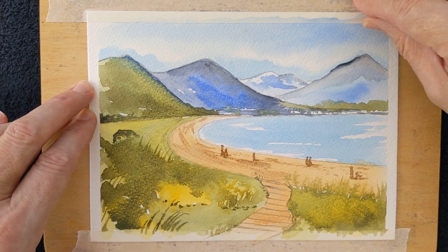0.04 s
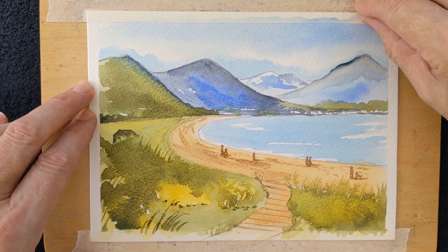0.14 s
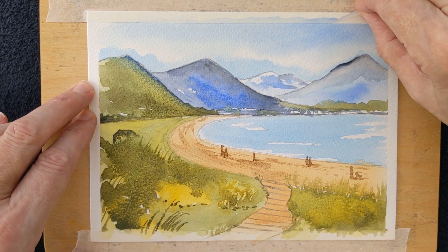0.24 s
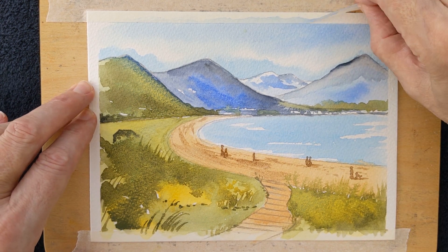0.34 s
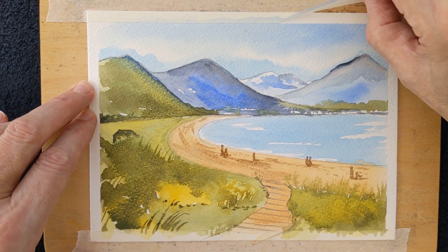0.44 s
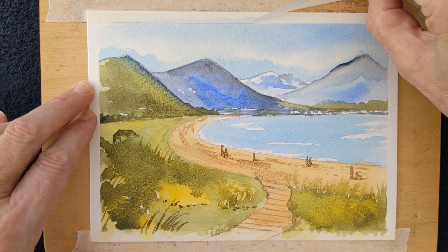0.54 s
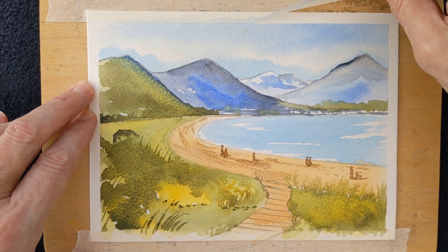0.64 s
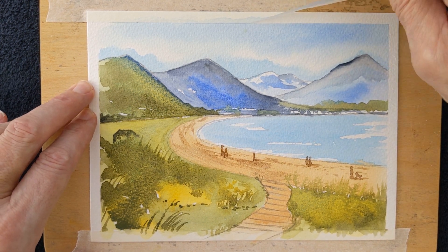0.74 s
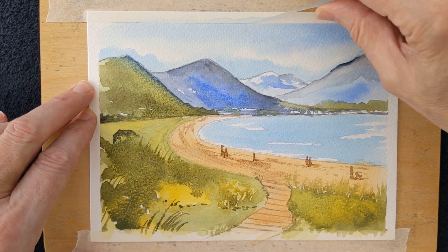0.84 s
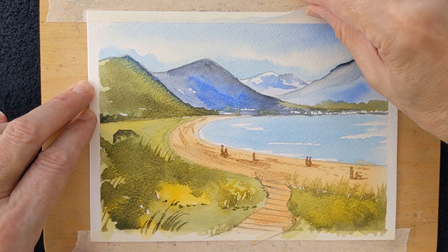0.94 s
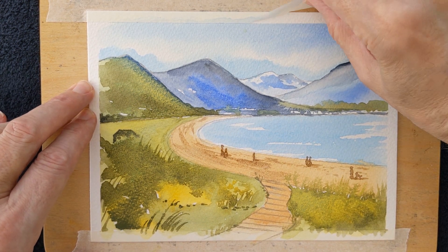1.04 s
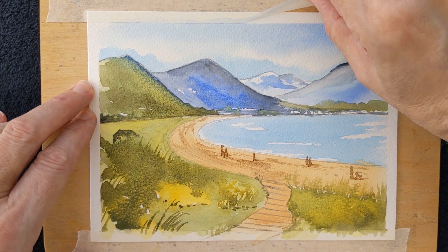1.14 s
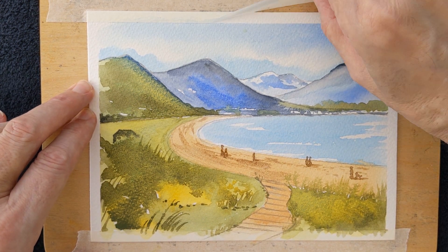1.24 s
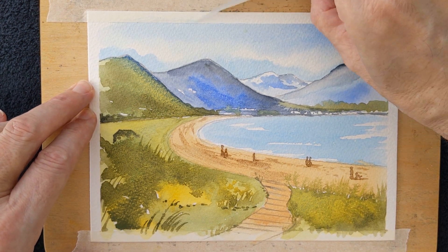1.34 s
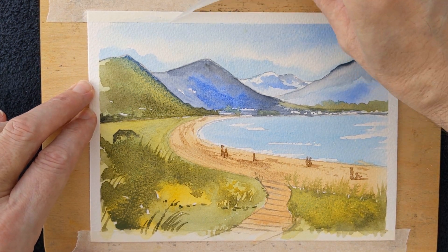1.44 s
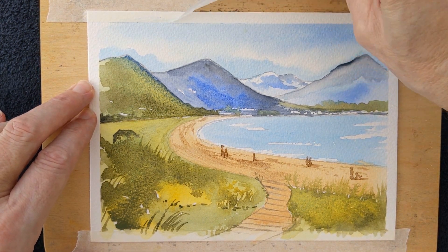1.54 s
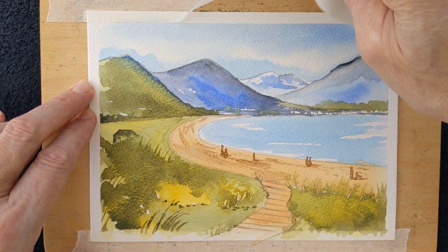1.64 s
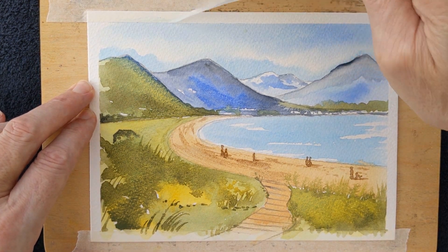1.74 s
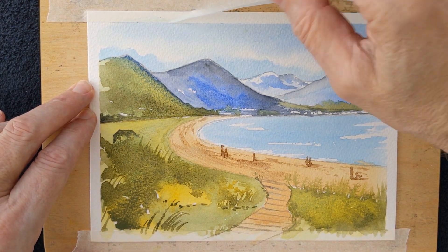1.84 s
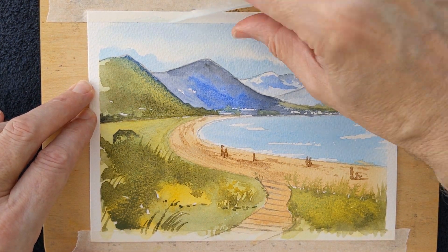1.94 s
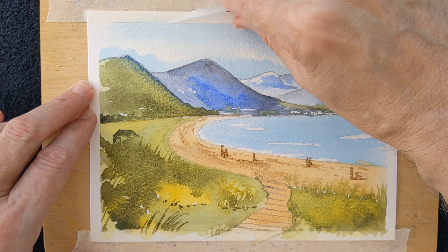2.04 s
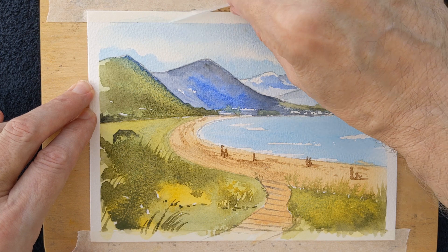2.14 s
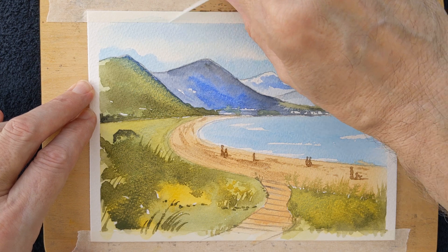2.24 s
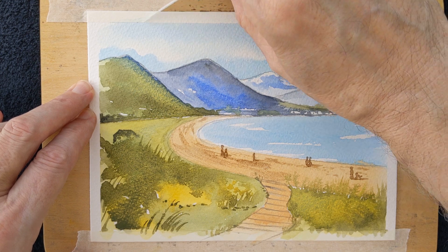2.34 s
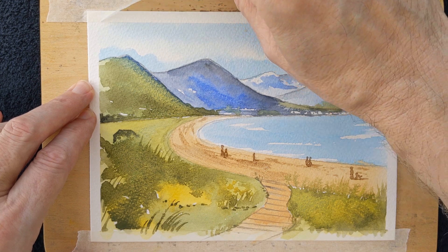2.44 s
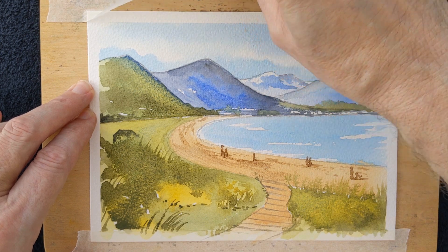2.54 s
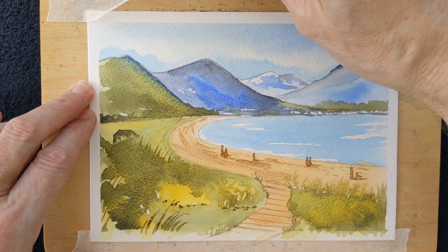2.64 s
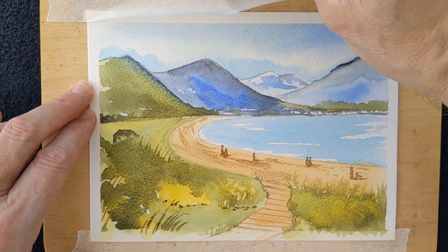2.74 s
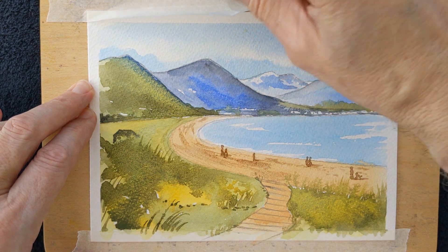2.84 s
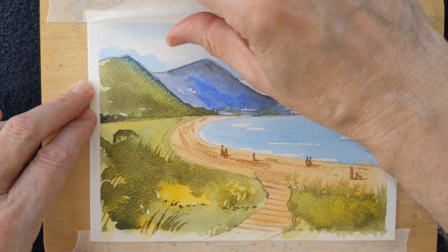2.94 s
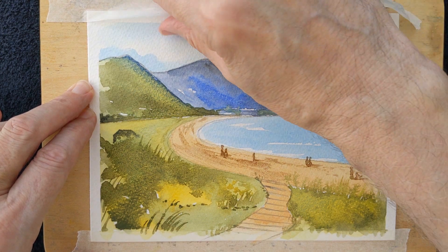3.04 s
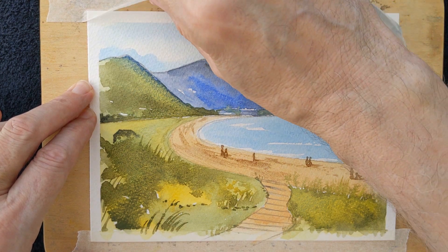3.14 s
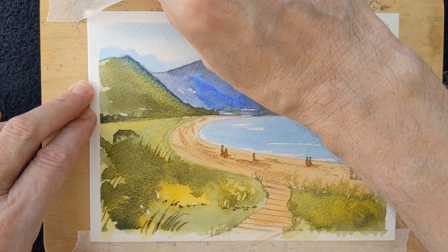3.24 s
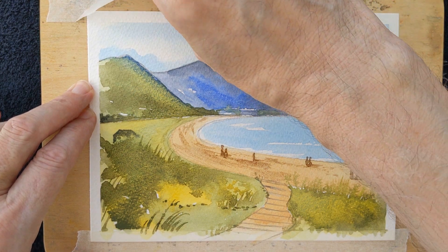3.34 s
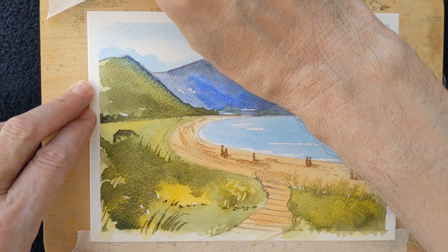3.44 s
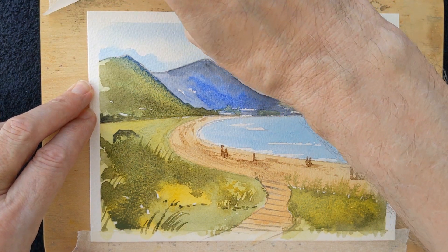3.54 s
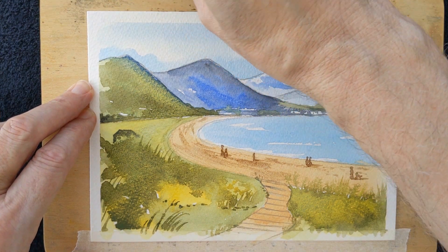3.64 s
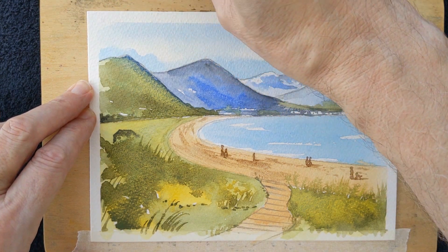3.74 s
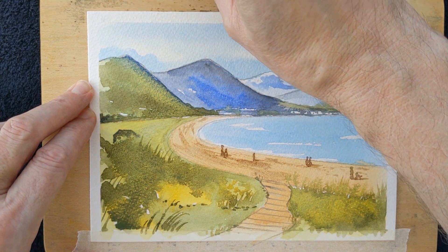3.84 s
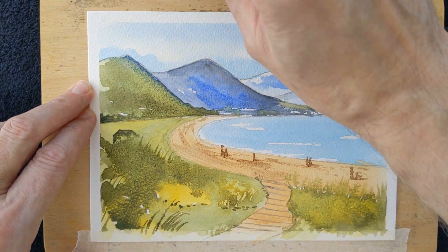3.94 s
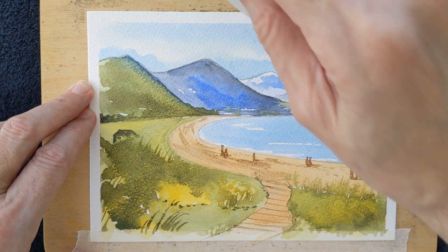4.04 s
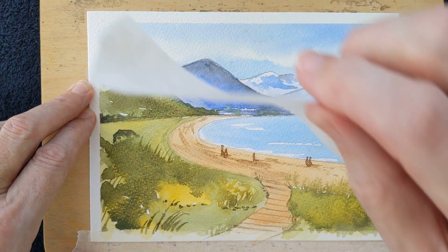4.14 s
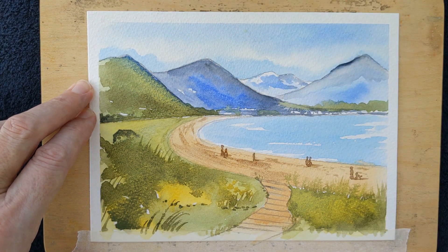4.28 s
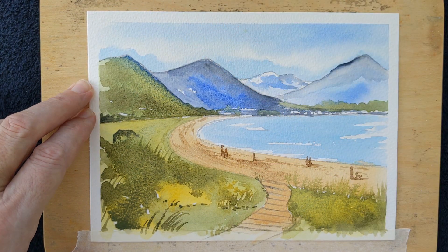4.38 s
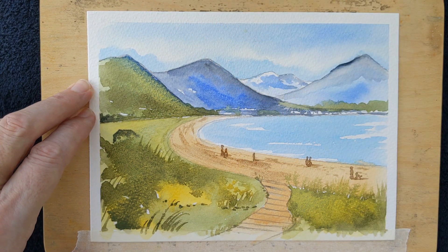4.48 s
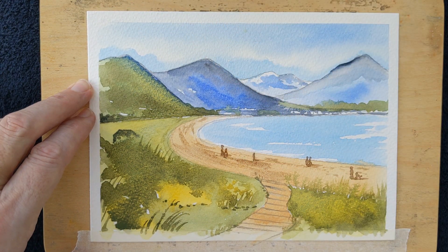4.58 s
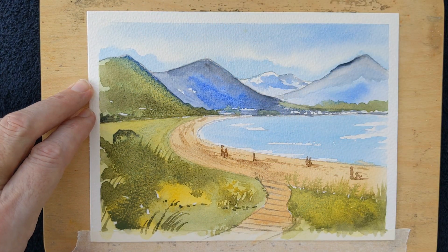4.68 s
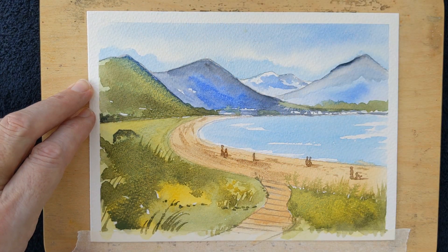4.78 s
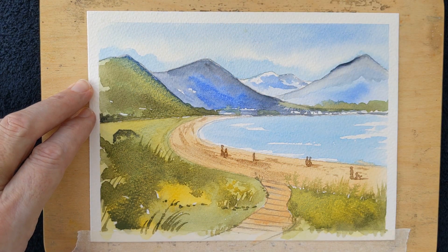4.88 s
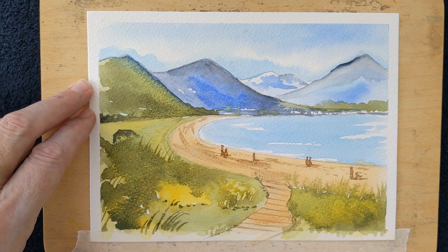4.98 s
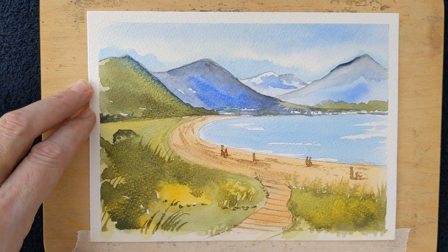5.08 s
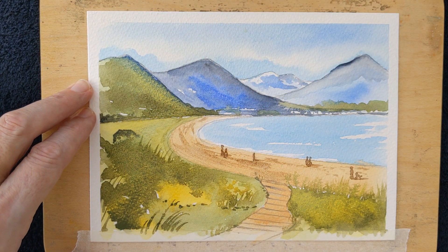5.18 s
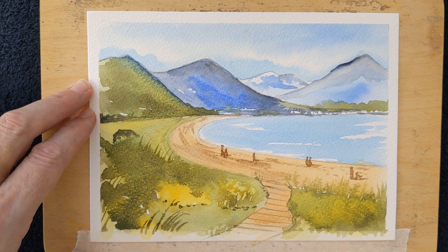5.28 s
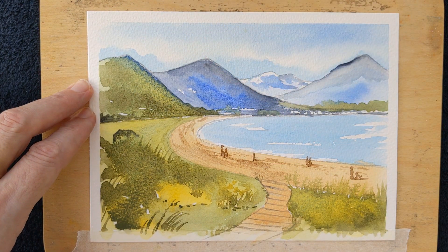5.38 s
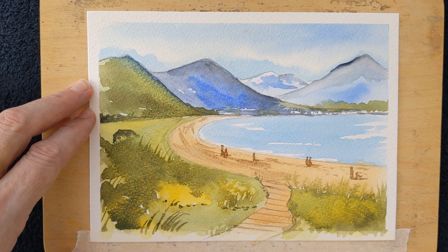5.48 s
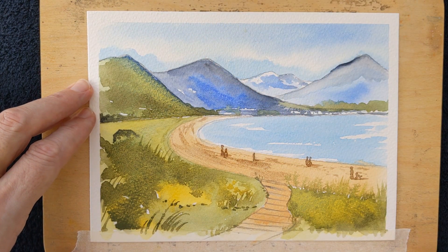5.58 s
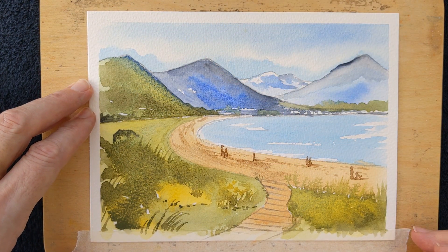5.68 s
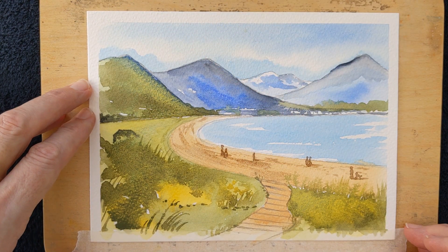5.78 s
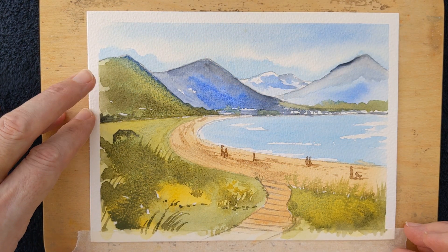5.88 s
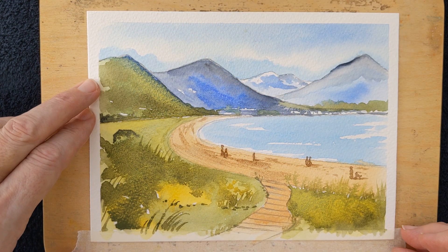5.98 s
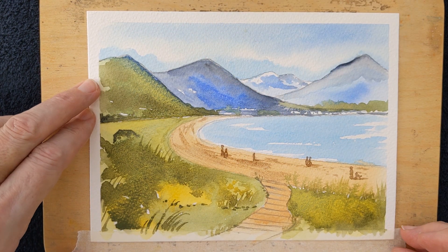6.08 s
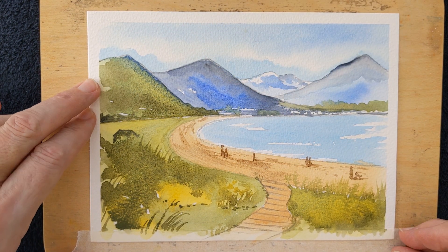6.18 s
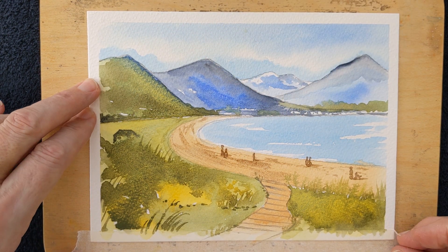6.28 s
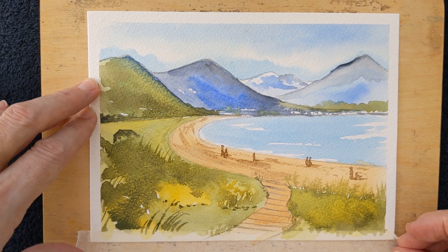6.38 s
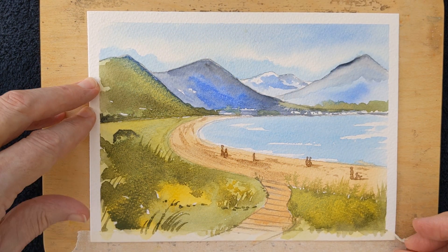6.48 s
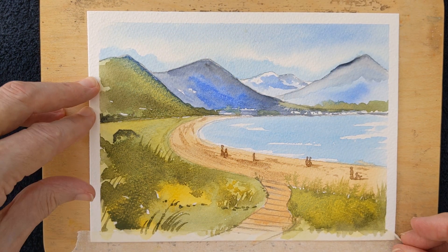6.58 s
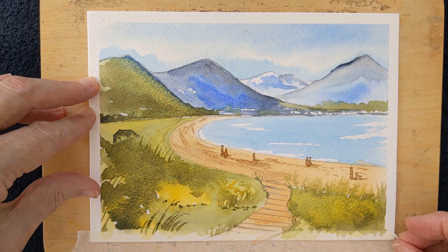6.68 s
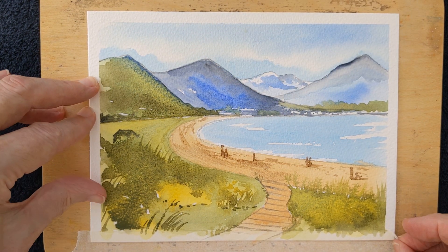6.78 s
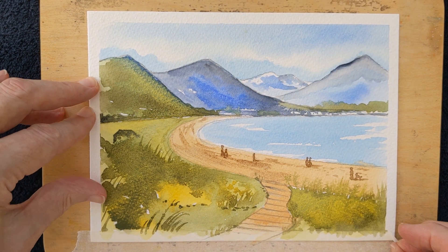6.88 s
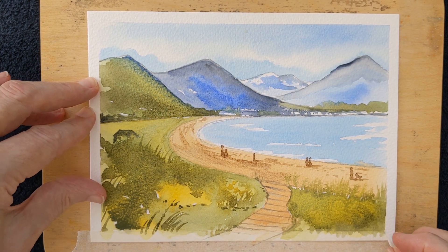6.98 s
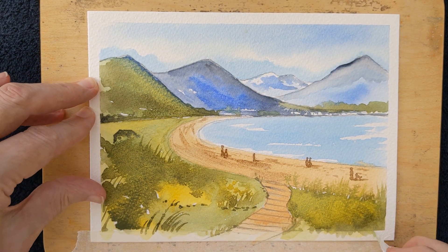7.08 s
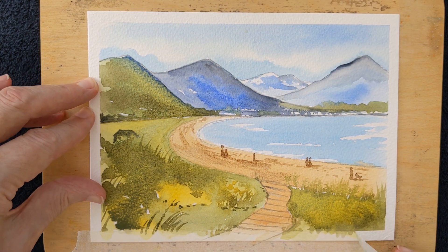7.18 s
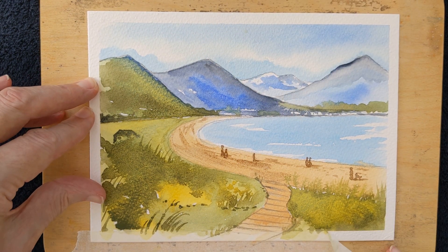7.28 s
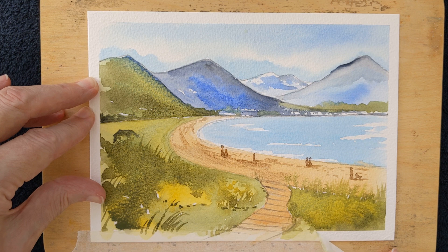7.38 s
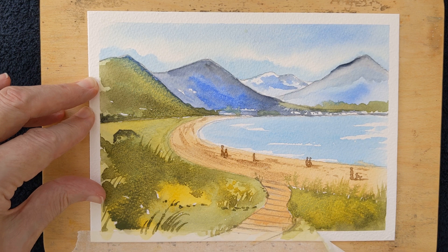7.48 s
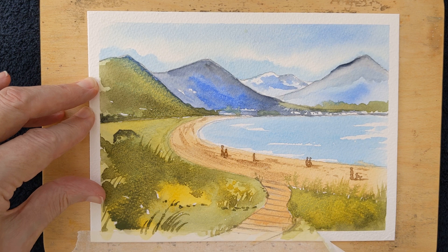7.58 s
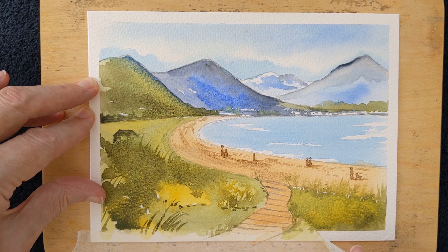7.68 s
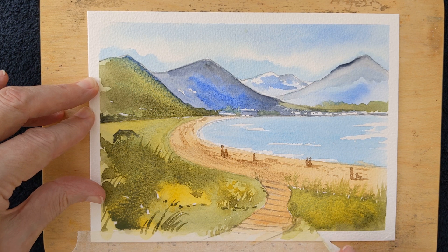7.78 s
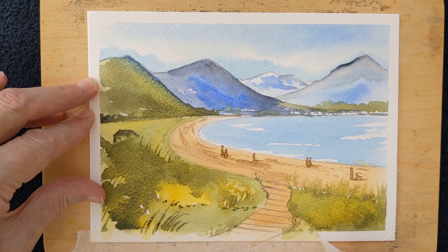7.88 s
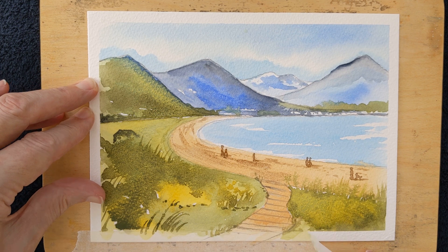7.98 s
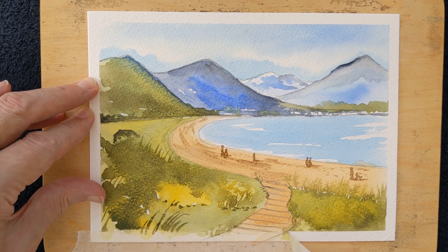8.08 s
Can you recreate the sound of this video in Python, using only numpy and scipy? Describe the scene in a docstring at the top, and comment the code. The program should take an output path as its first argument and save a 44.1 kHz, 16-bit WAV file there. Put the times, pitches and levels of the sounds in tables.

```python
"""Masking tape peeled off paper

Short pulls lift tape from a sheet on a wooden board in a small room: noise-burst cracks of glue strands
make the rasp, peaked bursts the snaps, loud and faint, where the strip sticks and slips. Mostly between two
strips, fingers tap (noise knock plus board modes), rub (uneven noise) and pick at a corner (denser cracks).
A deep noise rumble swells once under the first pull; air noise and a faint sine hum run throughout."""
import sys
import numpy as np
from scipy import signal
from scipy.fft import rfft, irfft
from scipy.io import wavfile
from scipy.ndimage import uniform_filter1d

SR = 44100
rng = np.random.default_rng(int(sys.argv[2]) if len(sys.argv) > 2 else 0)


def output_pcm(signal):
    """Save a mono or channel-first signal as 16-bit PCM at the path in sys.argv[1].

    Samples are clipped to [-1, 1] before scaling.
    """
    pcm = np.clip(np.atleast_2d(signal).T, -1, 1) * 32767
    wavfile.write(sys.argv[1], SR, np.round(pcm).astype(np.int16))


N = 358091


def gain_of(db):
    """Decibels to amplitude."""
    return 10 ** (np.asarray(db) / 20)


def evened(x):
    """Scales to rms 1."""
    return x / np.sqrt(np.mean(x ** 2) + 1e-20)


def read(points, hz):
    """Reads a table along a log-frequency axis."""
    f, value = np.transpose(points)
    return np.interp(np.log(hz + 1), np.log(f + 1), value)


def add(mix, start_s, sound):
    """Adds a stereo sound to the mix at start_s."""
    part = mix[:, round(start_s * SR):][:, :sound.shape[1]]
    part += sound[:, :part.shape[1]]


def bins(size=2048):
    """Frequencies [Hz] on which colours are drawn."""
    return np.fft.rfftfreq(size, 1 / SR)


def coloured(x, db):
    """Minimum-phase filter of unit energy, shaped by db over bins()."""
    both_sides_db = np.r_[db, db[-2:0:-1]]
    log_gain = np.log(gain_of(both_sides_db))
    response = np.exp(signal.hilbert(log_gain).conj())
    taps = np.fft.ifft(response).real[:len(db)]
    taps = taps / np.linalg.norm(taps)
    return signal.fftconvolve(x, taps[None], axes=1)


def paired(x, same):
    """Mixes two unrelated channels to the likeness in same: (frequency [Hz], likeness [0-1])."""
    a, b = rfft(x)
    likeness = np.clip(read(same, np.fft.rfftfreq(x.shape[1], 1 / SR)), -1, 1)
    right = likeness * a + np.sqrt(1 - likeness ** 2) * b
    return irfft(np.array([a, right]), x.shape[1])


# Room air spectrum: (frequency [Hz], level [dB])
AIR_COLOUR = [(15, -8), (42, 1.5), (65, -9.5), (110, -13), (160, -12), (230, -15.5), (420, -18.5),
              (700, -14.5), (1000, -22), (2000, -25), (5000, -30), (7500, -38), (11000, -32.5),
              (16000, -38)]
# Left-right likeness of air and rumble: (frequency [Hz], likeness [0-1])
AIR_LIKENESS = [(30, 0.4), (65, 0.48), (130, 1), (300, 0.067), (700, 0.05), (2000, 0.039)]
# Appliance hum partials: (frequency [Hz], rms level [dB])
HUM_PARTIALS = [(161.5, -79), (300.1, -73), (600, -84.5), (699.8, -83.5)]
AIR_RMS_DB = -64.5


def background(waver=0.058):
    """Still air as shaped noise; appliance hum as sines wavering in level and phase."""
    t = np.arange(N) / SR
    noise = paired(rng.standard_normal((2, N)), AIR_LIKENESS)
    air = coloured(noise, read(AIR_COLOUR, bins()))[:, :N]
    knots_s = np.linspace(0, t[-1], 24)

    def drift():
        """Slow random waver, interpolated between knots."""
        return np.interp(t, knots_s, rng.standard_normal(len(knots_s)))

    hum = np.zeros(N)
    for hz, rms_db in HUM_PARTIALS:
        level = gain_of(rms_db) * (1 + waver * drift())
        hum += level * np.sin(2 * np.pi * hz * t + 2 * waver * drift())
    return gain_of(AIR_RMS_DB) * evened(air) + np.sqrt(2) * hum


def burst(decay_s, same, size=512):
    """Crack: stereo noise that dies at once, unit energy per channel."""
    t = np.arange(size) / SR
    envelope = (1 + t / decay_s) * np.exp(-t / decay_s)
    x = paired(rng.standard_normal((2, size)), same) * envelope
    return x / np.linalg.norm(x, axis=1, keepdims=True)


def stroke(rise_s, hold_s, fade_s, from_db, to_db):
    """Level [dB] of one hand movement: gathers speed, holds, lets up."""
    corners_s = np.cumsum([0, rise_s, hold_s, fade_s])
    return np.interp(np.arange(0, corners_s[-1], 1 / SR), corners_s, [from_db, 0, 0, to_db])


def rasp(level_db, bass_db, treble_db, spectrum, strands_per_s, spread_db, grip_db,
         patches_per_s=150, patchy_db=2.5, count=12):
    """Random cracks with drifting grip, each patch in one of count random colours."""
    n, hz = len(level_db), bins()
    sample = np.arange(n)
    knots = np.linspace(0, n, round(n / SR * patches_per_s) + 2)
    drift_db = grip_db * np.interp(sample, knots, rng.standard_normal(len(knots)))
    size_db = spread_db * np.minimum(rng.exponential(1, n), 4) + drift_db
    hits = rng.random(n) < strands_per_s / SR
    strands = evened(hits * gain_of(size_db) * rng.choice([-1, 1], n)) * gain_of(level_db)
    colour = rng.integers(0, count, len(knots) + 1)[np.searchsorted(knots, sample)]
    # lifted paper adds bass, a short taut strip adds treble
    bass_shape_db = bass_db / (1 + (hz / 720) ** 3)
    treble_shape_db = treble_db / (1 + (6500 / (hz + 1)) ** 4)
    shape_db = read(spectrum, hz) + bass_shape_db + treble_shape_db
    same = [(400, 0.81), (1400, 0.21), (5000, 0.065), (12000, 0.47)]
    x = 0
    for k in range(count):
        peaks = read([(f, rng.standard_normal()) for f in np.geomspace(200, 16000, 24)], hz)
        cracks = signal.fftconvolve((strands * (colour == k))[None], burst(0.00045, same), axes=1)
        x = x + coloured(cracks, shape_db + patchy_db * peaks)
    return x


# Spectrum of taut strip and paper under it: (frequency [Hz], level [dB])
TAUT_STRIP = [(60, -18), (150, -15), (230, -14), (350, -8.5), (650, -2), (1050, -3.5), (1600, -1.5),
              (2300, -3.5), (3300, -4), (5400, -4), (7500, -14.5), (10500, -13.5), (13000, -18.5),
              (16000, -28.5)]
# Distinct single snaps, loud and faint, at set times:
# (time [s], ring level [dB], ring frequency [Hz], crack level [dB])
TIMED_SNAPS = [(0.302, -38.5, 2180, -50), (0.343, -31, 2200, -40), (0.4026, -30.5, 1420, -53),
               (0.4078, -29.5, 4400, -39), (0.451, -33.5, 4900, -52), (0.471, -25.5, 1880, -58),
               (0.6953, -39.5, 1650, -63), (0.722, -47.5, 2760, -76), (1.0695, -39.5, 3530, -68),
               (1.237, -46.5, 2780, -47), (1.2443, -31, 1730, -52), (1.2809, -33, 1750, -62),
               (1.296, -28.5, 2850, -52), (1.323, -28, 1570, -40), (1.3928, -27, 1560, -41),
               (1.5889, -40, 1900, -46), (2.1945, -48.5, 3140, -60), (2.3147, -28, 2220, -59),
               (2.4671, -31, 1960, -47), (2.653, -48, 1720, -50), (3.236, -47.5, 1700, -51),
               (3.4476, -29.5, 1170, -32), (3.4767, -32, 1030, -30.5), (3.603, -32.5, 774, -59),
               (7.1344, -45.5, 1370, -44), (7.193, -41, 1334, -61), (7.3646, -43, 1420, -37),
               (8.0336, -41.5, 1210, -36)]


def snap(ring_db, ring_hz, crack_db, peak_db=8, width_octaves=0.28, ring_s=0.0012, crack_s=0.0013):
    """Stuck strip lets go: a sharp crack plus a short noise burst peaked at ring_hz."""
    hz = bins()
    octaves_off = np.log2((hz + 1) / ring_hz)
    bump_db = peak_db * np.exp(-.5 * (octaves_off / width_octaves) ** 2)
    ring = burst(ring_s, [(500, 1.0), (2500, 0.17), (8000, 0.04)])
    ring = coloured(ring, read(TAUT_STRIP, hz) + bump_db)
    crack_shape = [(800, -10.0), (5000, -2.5), (7500, -2.5), (10500, 2.5), (16000, -2.5)]
    crack = coloured(burst(crack_s, [(2000, 0.8), (12000, 0.074)]), read(crack_shape, hz))
    x = gain_of(ring_db) * ring / np.linalg.norm(ring)
    x = x + gain_of(crack_db) * crack / np.linalg.norm(crack)
    level_window_s = .003  # each part's level is its rms over this span
    return x * np.sqrt(2 * level_window_s * SR)


# Pulls on the strip: (time [s], rise [s], hold [s], fade [s], level [dB], bass [dB], treble [dB],
# creep before it [s])
STRIP_PULLS = [(0.337, .125, 0.077, .04, -39.5, -6, 2, 0.072),
               (0.687, .004, 0.019, .06, -52.5, 3, -23, 0.0033),
               (1.243, .06, 0.15, .025, -40, 0.5, 1.5, 0.071),
               (1.589, .004, .1, .03, -52, -7.5, 9.5, 0.0019),
               (2.181, .012, 0.057, .04, -54.5, 0.5, 13, 0.0022),
               (2.312, .004, .15, .1, -41.5, 3, 9.5, 0.058), (2.674, .006, 0.019, .05, -49.5, 4, 7, 0.061),
               (3.276, 0.011, .014, .015, -48.5, 6.5, 12.5, 0.041),
               (3.444, .02, .035, .02, -40, 14, 15, 0.00036), (3.605, .003, 0.02, .035, -36, 6, 9, 0.00052),
               (7.129, 0.061, .1, .12, -43, 2.5, 5, .07), (8.033, .05, 0.044, .02, -40, -19, 5, .015)]
# Colour shift of second strip, along the near edge of the board: (frequency [Hz], level [dB])
NEAR_EDGE_COLOUR = [(450, -5.5), (800, -2), (1300, 2), (2100, -2), (3100, -2), (5300, 1), (7000, 0.5),
                    (12000, 3.5)]
SECOND_STRIP_S = 6
PULL_FROM_DB, PULL_TO_DB = -9, -12.5  # ends of a pull, re its full level
CREEP_FROM_DB, CREEP_TO_DB = -65.5, -55.5
SLIP_GAP_S, SLIP_JITTER_GAPS = .019, .45
SLIP_RING_DB, SLIP_CRACK_DB, SLIP_SPREAD_DB = -1.5, -3.5, 3.5  # re pull level
FIRST_RING_HZ, SECOND_RING_HZ, SLIP_SPREAD_OCTAVES = 1900, 1360, 0.54  # per strip


def pull(start_s, rise_s, hold_s, fade_s, db, bass_db, treble_db, creep_s):
    """Glue creeps as the strip tautens, then rasps away; uneven slips follow the pull's level."""
    second = start_s > SECOND_STRIP_S
    colour_db = read(TAUT_STRIP, bins()) + second * read(NEAR_EDGE_COLOUR, bins())
    strip = np.c_[bins(), colour_db]
    creep_db = np.linspace(CREEP_FROM_DB, CREEP_TO_DB, round(creep_s * SR))
    level_db = np.r_[creep_db, db + stroke(rise_s, hold_s, fade_s, PULL_FROM_DB, PULL_TO_DB)]
    x = rasp(level_db, bass_db, treble_db, strip, strands_per_s=2200, spread_db=4.5, grip_db=1.0)
    lead_s = len(creep_db) / SR
    centre_hz = SECOND_RING_HZ if second else FIRST_RING_HZ
    for beat_s in np.arange(lead_s + SLIP_GAP_S, len(level_db) / SR, SLIP_GAP_S):
        late, ring, crack, pitch = np.clip(rng.standard_normal(4), -1.5, 1.5)
        slip_s = beat_s + SLIP_JITTER_GAPS * SLIP_GAP_S * late
        pull_db = level_db[min(round(slip_s * SR), len(level_db) - 1)]
        ring_db = pull_db + SLIP_RING_DB + SLIP_SPREAD_DB * ring
        crack_db = pull_db + SLIP_CRACK_DB + SLIP_SPREAD_DB * crack
        ring_hz = centre_hz * 2 ** (SLIP_SPREAD_OCTAVES * pitch)
        add(x, slip_s, snap(ring_db, ring_hz, crack_db))
    return start_s - lead_s, x


# Rumble: (time [s], length [s], level [dB])
RUMBLE_EVENT = (0.42, 0.24, -57)
# Rumble spectrum: (frequency [Hz], level [dB])
RUMBLE_SPECTRUM = [(20, -8), (50, 2), (100, -19), (170, -6.5), (260, -18), (2000, -63)]


def rumble():
    """Deep soft noise that swells and fades under the first pull."""
    start_s, length_s, db = RUMBLE_EVENT
    n = round(length_s * SR)
    x = paired(rng.standard_normal((2, n)), AIR_LIKENESS) * signal.windows.tukey(n, .6)
    return start_s, gain_of(db) * coloured(x, read(RUMBLE_SPECTRUM, bins()))


# Loose strip brushing fingers, nail picking its corner: (time [s], rise [s], hold [s], fade [s],
# level [dB], bass [dB], treble [dB])
STRIP_RUSTLES = [(1.067, 0.0029, 0.011, 0.05, -62, -7, -3), (3.101, 0.076, 0.21, 0.11, -64, 2, 0),
                 (4.239, .035, .03, .12, -71.5, 28, -22), (4.9, 0.15, .03, 0.019, -65.5, -2, -3),
                 (5.088, .045, .035, .045, -47, -6.5, -1), (6.21, 0.0058, 0.011, .03, -60, -3, -22),
                 (6.279, .012, .09, 0.036, -65.5, 9, -2), (6.885, 0.063, 0.18, .08, -62.5, 9, 10.5),
                 (7.929, .03, .06, .02, -62.5, 2, -2)]
# Loose strip spectrum: (frequency [Hz], level [dB])
LOOSE_STRIP = [(100, -7), (600, -9), (1100, -12.5), (2000, -7), (2800, -6.5), (4000, -2), (5700, -3),
               (7500, -12.5), (11000, -11), (16000, -14)]
RUSTLE_FROM_DB, RUSTLE_TO_DB = -15.5, -11.5  # ends of a rustle, re its full level


def rustle(start_s, rise_s, hold_s, fade_s, db, bass_db, treble_db):
    """Slack strip or picked corner: denser cracks, no snaps."""
    level_db = db + stroke(rise_s, hold_s, fade_s, RUSTLE_FROM_DB, RUSTLE_TO_DB)
    x = rasp(level_db, bass_db, treble_db, LOOSE_STRIP, strands_per_s=5000, spread_db=3.5, grip_db=2.5)
    return start_s, x


# Hand sliding on paper, bearing on board: (start [s], end [s], level [dB])
HAND_RUBS = [(4.259, 4.358, -71), (5.719, 5.92, -71.5), (5.983, 6.023, -61), (6.203, 6.42, -58),
             (7.91, 7.962, -66)]
# Rub spectrum: (frequency [Hz], level [dB])
RUB_COLOUR = [(50, -12), (140, 3), (250, -6.5), (600, -5.5), (1300, -13), (2300, -11.5), (5000, -30),
              (14000, -48)]


def rub(start_s, end_s, db, grain_db=7.5):
    """Skin drags over rough paper: noise in small uneven catches."""
    n = round((end_s - start_s) * SR)
    catches = gain_of(grain_db * evened(uniform_filter1d(rng.standard_normal(n), 200)))
    noise = paired(rng.standard_normal((2, n)), [(200, 0.91), (3000, 0.13)])
    x = noise * catches * signal.windows.tukey(n, .4)
    return gain_of(db) * coloured(evened(x), read(RUB_COLOUR, bins()))


# Fingers on board: (time [s], relative level [dB], centre frequency [Hz], relative treble [dB])
FINGER_TAPS = [(4.274, -53.5, 600, -13), (5.875, -48, 960, -11), (6.002, -43, 990, -18),
               (6.168, -36, 730, -28), (6.291, -39, 1280, -11), (6.443, -52, 920, -16),
               (6.564, -50, 595, -15), (7.915, -50, 560, -15)]
# Board modes: (frequency [Hz], relative level [dB], t60 [s])
BOARD_MODES = [(172, -12, 0.08), (412, -31, .06), (636, -4, 0.1), (790, 4, 0.034), (886, -1.5, 0.047),
               (1100, -6.5, 0.044), (1390, -32, 0.02), (2200, -12, 0.043)]


def tap(tap_db, centre_hz, treble_db, ring_db=-13, dull_db=15, trim_db=2.0):
    """Fingertip knock as shaped noise; board modes ring briefly in a random balance per tap."""
    hz, t = bins(), np.arange(SR // 4) / SR
    body_db = -dull_db * np.log2((hz + 1) / centre_hz) ** 2
    shape_db = np.maximum(body_db, treble_db + 3.5 - hz / 400)
    knock = coloured(burst(0.0026, [(500, 1.0), (4000, 0.15)]), shape_db)
    ring = np.zeros(len(t))
    for mode_hz, db, t60_s in BOARD_MODES:
        decay = gain_of(db - 60 * t / t60_s)
        ring += (.5 + rng.random()) * decay * np.sin(2 * np.pi * mode_hz * t)
    x = np.tile(gain_of(ring_db) * ring, (2, 1))
    add(x, 0, knock / abs(knock).max())
    return gain_of(tap_db + trim_db) * x


# Room decay: (frequency [Hz], t60 [s])
ROOM_DECAY = [(100, 0.61), (400, 0.46), (1200, 0.43), (3000, 0.45), (5000, 0.41), (9000, 0.44),
              (15000, 0.3)]


def room(x, wet_db, first_s=0.0014, build_s=0.0025):
    """Close walls return a dense tail, each band dying at its own speed."""
    t = np.arange(SR) / SR
    echoes = rng.standard_normal((2, SR)) * (rng.random((2, SR)) < .15)
    echoes = paired(echoes, [(150, 1.0), (500, 0.79), (1200, 0)])
    hz, when_s, z = signal.stft(echoes, SR, nperseg=256)
    decay = gain_of(-60 * when_s / read(ROOM_DECAY, hz)[:, None])
    tail = signal.istft(z * decay, SR, nperseg=256)[1][:, :SR]
    tail = tail * np.clip((t - first_s) / build_s, 0, 1)
    tail = tail / np.linalg.norm(tail, axis=1, keepdims=True)
    return x + gain_of(wet_db) * signal.fftconvolve(x, tail, axes=1)[:, :N]


# Stereo lean of tape: (frequency [Hz], left minus right [dB])
TAPE_LEAN = [(400, -1.5), (1100, 0.26), (2300, 1.3), (4500, -0.5), (8500, -0.5), (13000, -7)]


def lean(tape):
    """Splits a level difference per frequency evenly between left and right."""
    lean_db = read(TAPE_LEAN, np.fft.rfftfreq(N, 1 / SR))
    return irfft(rfft(tape) * gain_of(np.array([lean_db, -lean_db]) / 2), N)


def scene(count=3):
    """Tape and fingers in the room, over the background."""
    tape, hand = np.zeros((2, 2, N))
    for row in STRIP_PULLS:
        add(tape, *pull(*row))
    for start_s, *slip in TIMED_SNAPS:
        add(tape, start_s, snap(*slip))
    add(hand, *rumble())
    for row in STRIP_RUSTLES:
        add(tape, *rustle(*row))
    for row in HAND_RUBS:
        add(hand, row[0], rub(*row))
    for start_s, *touch in FINGER_TAPS:
        add(hand, start_s, tap(*touch))
    tape = lean(tape)
    # room echoes: successive seconds cycle through count random tails
    tail_index = np.arange(N) // SR % count
    peeling = sum(room(tape * (tail_index == k), wet_db=-0.5) for k in range(count))
    return peeling + room(hand, wet_db=-1.5) + background()


EDGE_HZ = 15950


def record(dry):
    """Band limit: linear-phase lowpass at EDGE_HZ."""
    lowpass = signal.firwin(511, EDGE_HZ, window=("kaiser", 9), fs=SR)
    return signal.oaconvolve(dry, lowpass[None], "same")


dry = scene()
out = record(dry)
output_pcm(out)
```